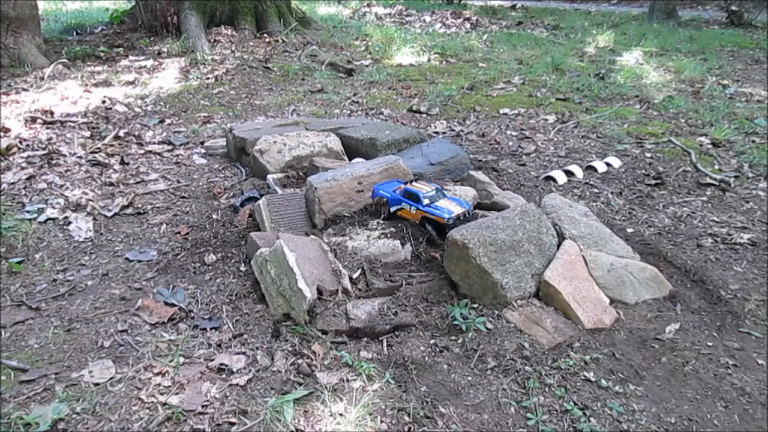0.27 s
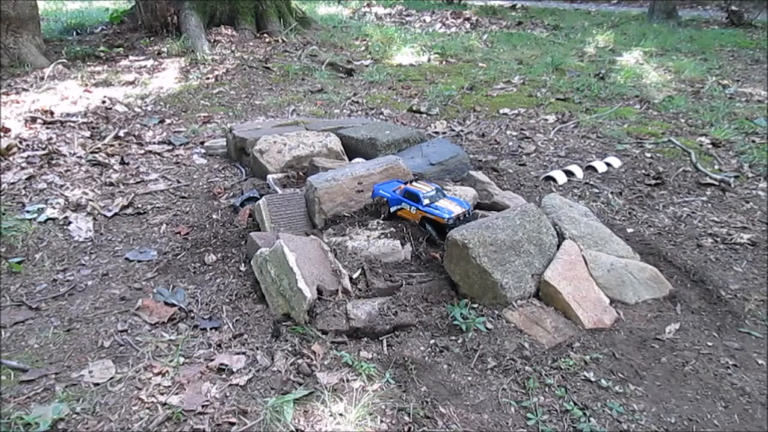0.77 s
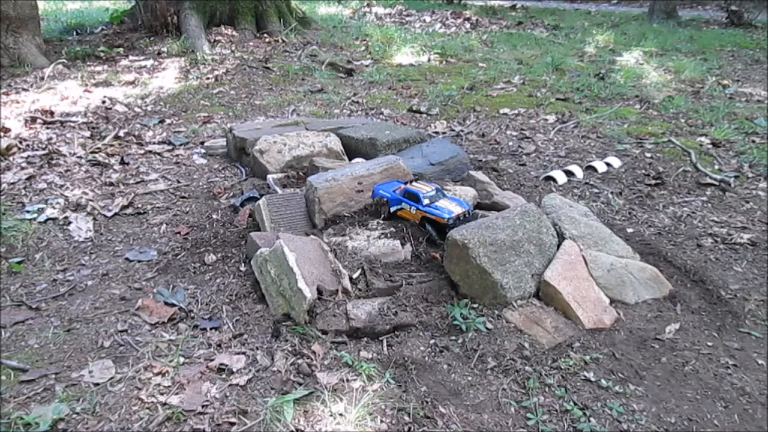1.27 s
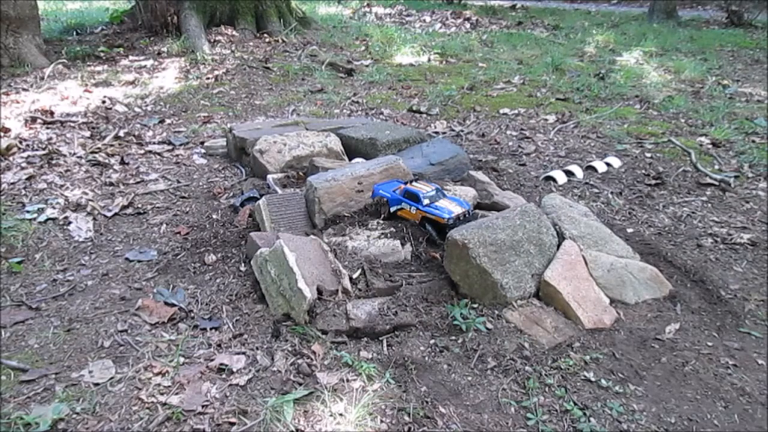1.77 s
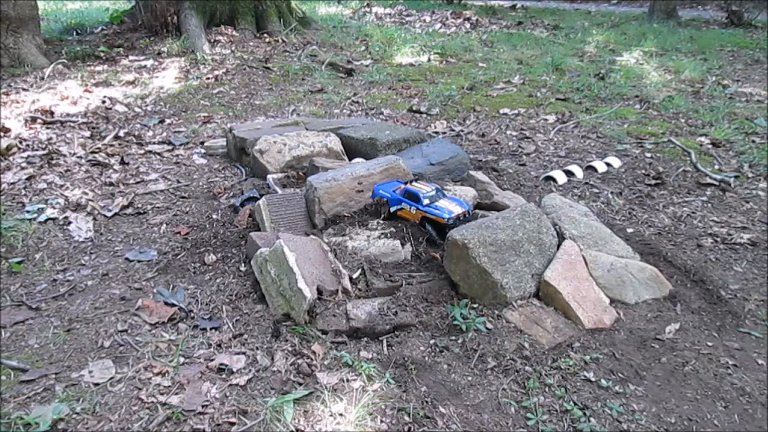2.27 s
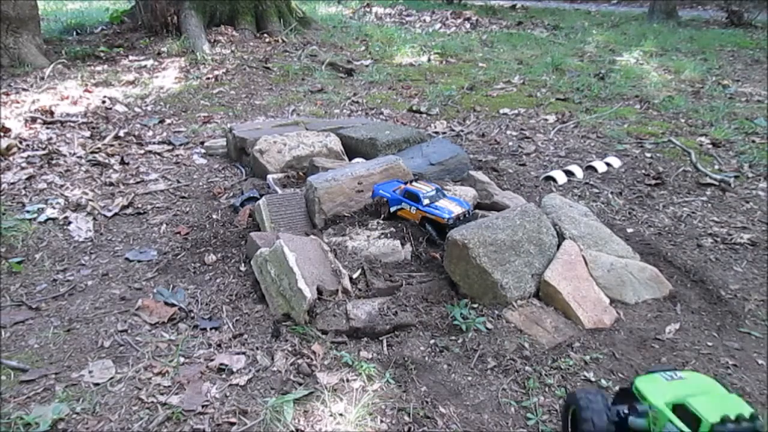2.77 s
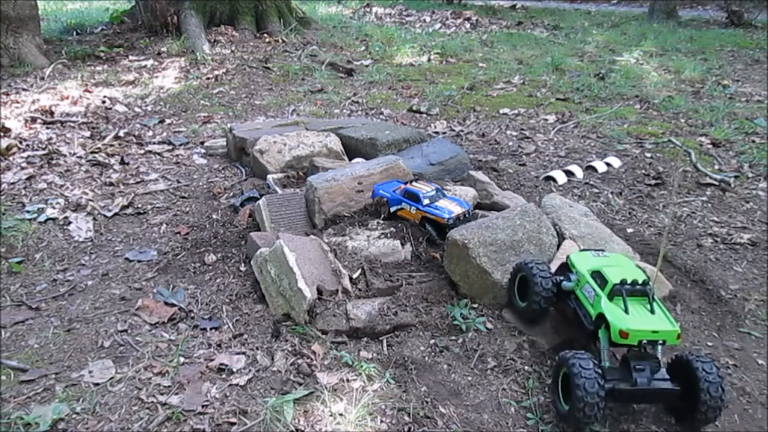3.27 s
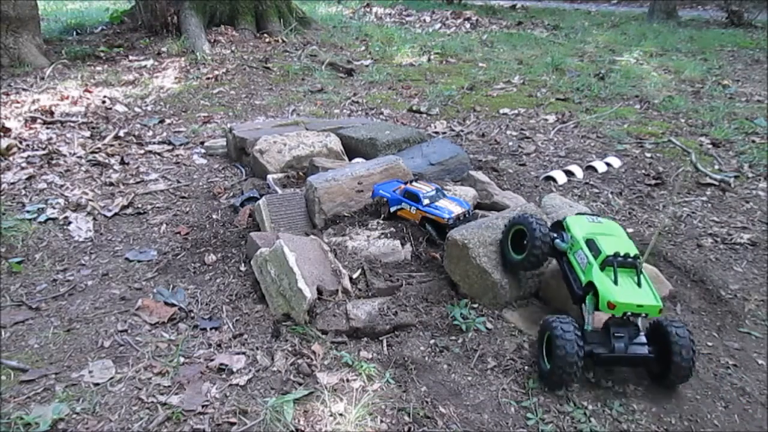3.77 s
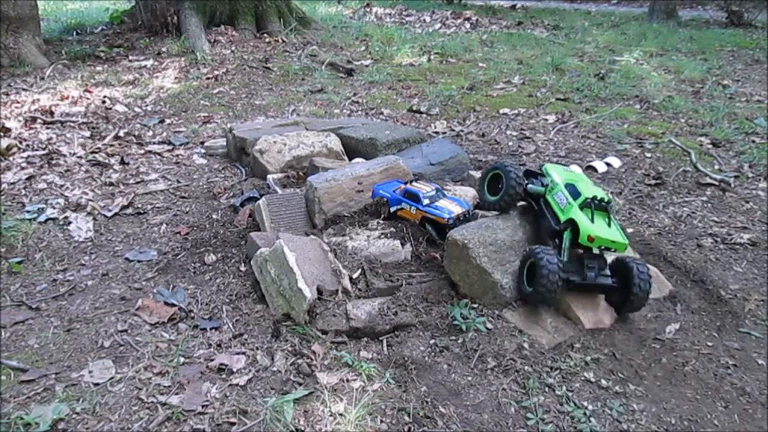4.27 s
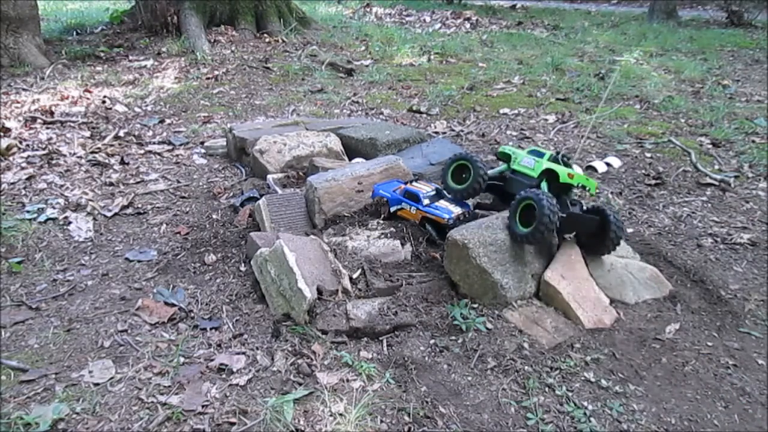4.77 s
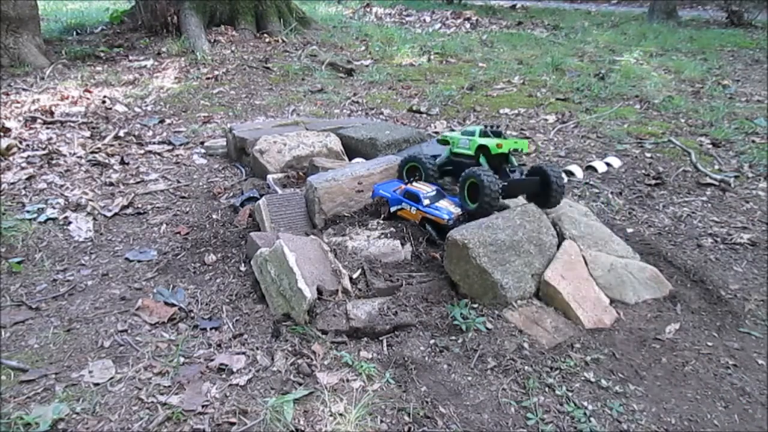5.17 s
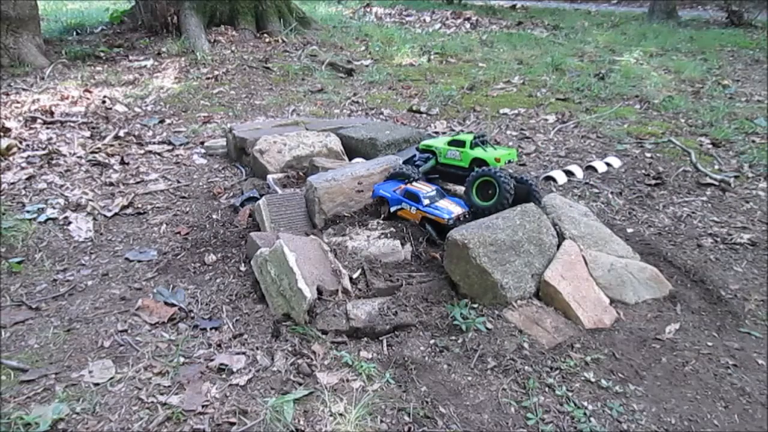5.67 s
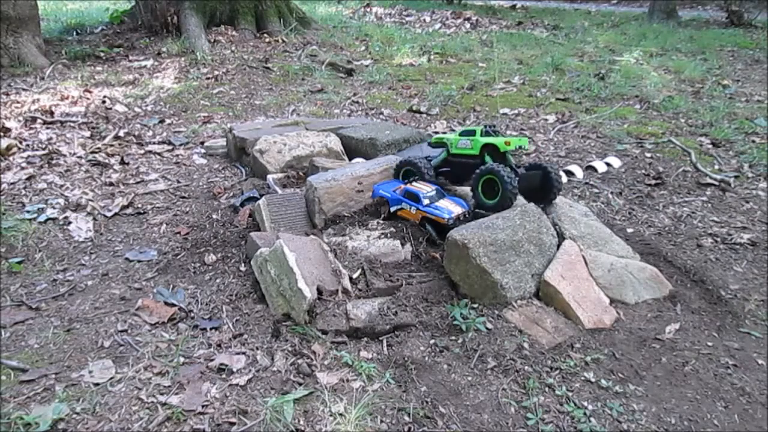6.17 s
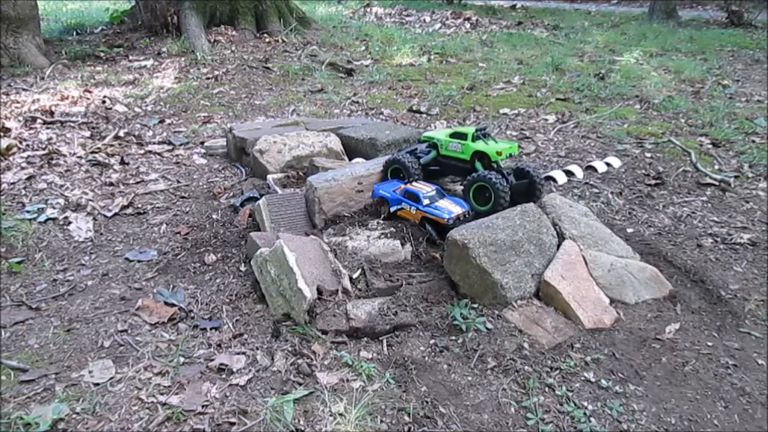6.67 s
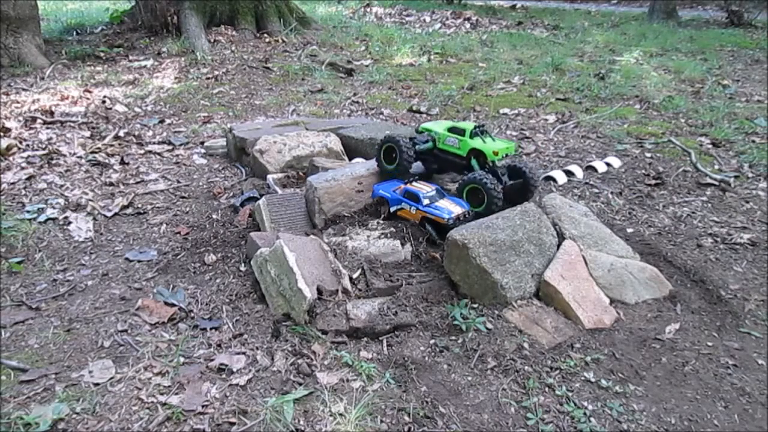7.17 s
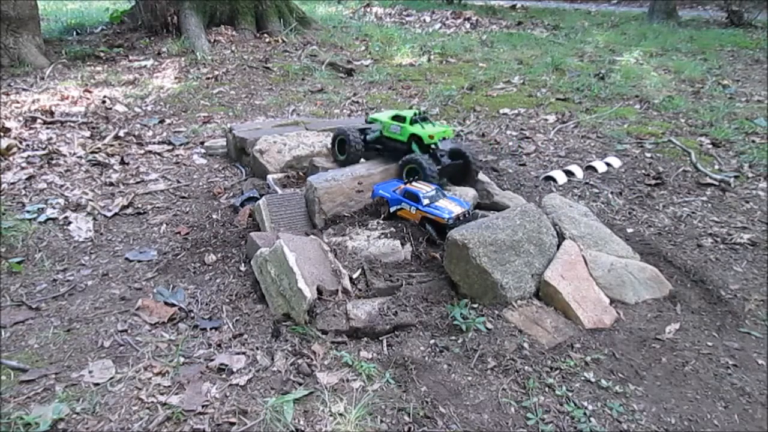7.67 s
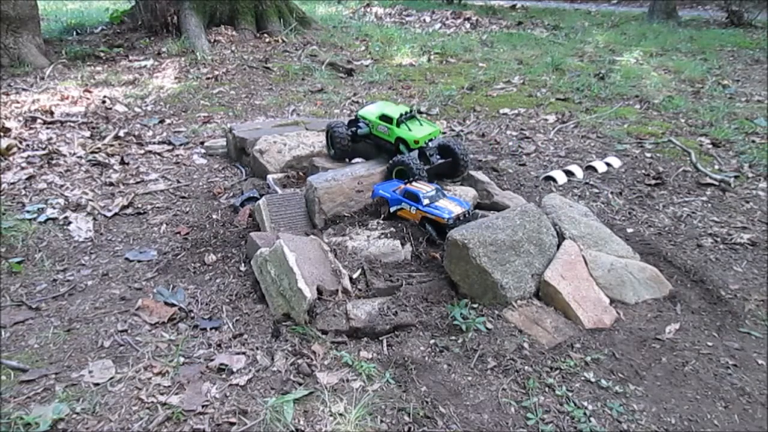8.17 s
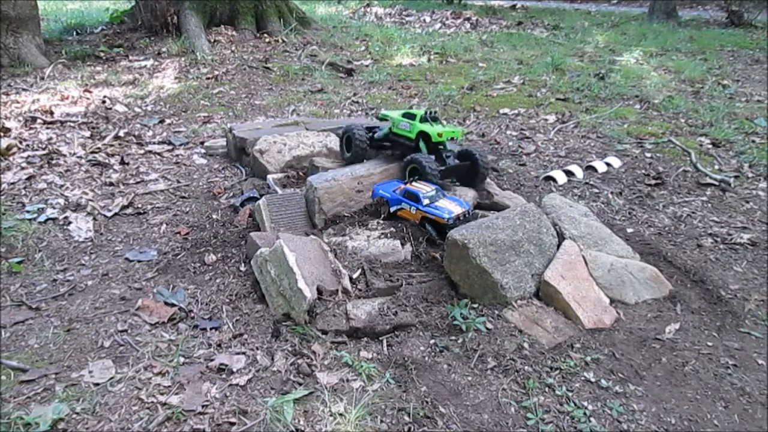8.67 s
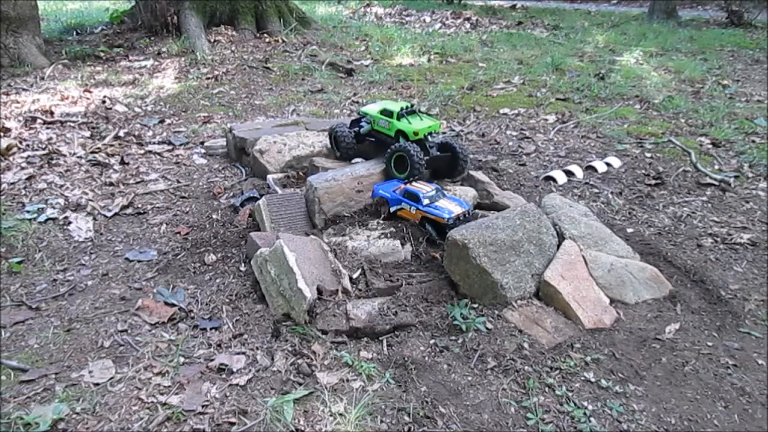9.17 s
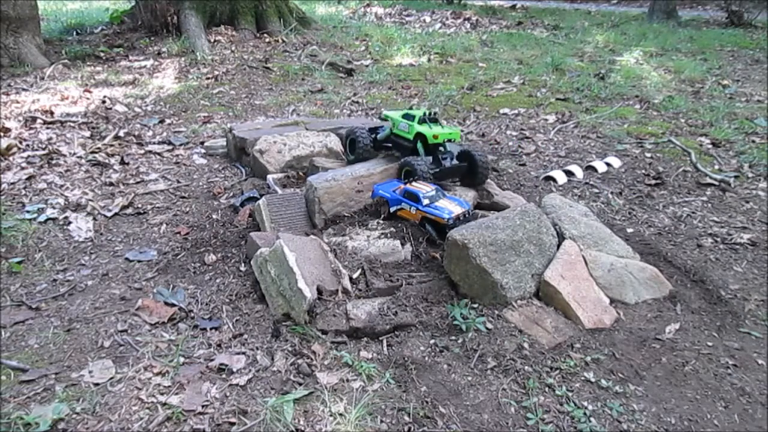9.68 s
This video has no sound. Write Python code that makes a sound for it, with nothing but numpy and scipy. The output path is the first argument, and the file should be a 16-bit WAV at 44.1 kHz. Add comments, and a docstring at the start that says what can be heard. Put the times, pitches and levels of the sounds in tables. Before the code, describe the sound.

Outdoors, over a soft hiss and a faraway hum, the plastic gearbox of a toy crawler whirs and rattles close in front of the microphone. The buggy drives past with a wavering whine, and its gears click as they slip under load. It then works its way up some rocks in stop-start bursts, with gritty scuffs, small knocks of wheels on stone and faint thin whistles in a few pauses.

```python
"""A toy remote-control crawler in a garden, over a distant low hum and a soft hiss.
It approaches in bursts of throttle, plastic gears whining and rattling in their housing, and passes
at about 2 s. It turns just after 3 s, the gears ratcheting under load. From about 4 s it climbs a rock
pile, first in longer drives, then in short bursts, with faint whistles in some pauses. Tyres scrub
grit; wheels and chassis knock on stone."""
import sys
import numpy as np
from scipy import signal
from scipy.fft import rfft, irfft, next_fast_len
from scipy.io import wavfile
from scipy.ndimage import uniform_filter1d, map_coordinates

SR = 44100
rng = np.random.default_rng(int(sys.argv[2]) if len(sys.argv) > 2 else 0)


def digitize_waveform(pressure):
    """Quantize a signal to 16-bit integers and store it at the path in sys.argv[1].

    Rows of a 2-D input are taken as channels; values are limited to [-1, 1].
    """
    field = np.atleast_2d(pressure).T
    bounded = np.clip(field, -1, 1)
    quanta = np.round(bounded * 32767).astype(np.int16)
    wavfile.write(sys.argv[1], SR, quanta)


N = 437913
PINION_TEETH = 8


def amp(db):
    """Decibels to gain."""
    return 10 ** (np.asarray(db) / 20)


def unit(x):
    """Scale to rms 1."""
    return x / np.sqrt(np.mean(x ** 2) + 1e-20)


def blend(a, b, share):
    """Constant-power mix, share of it from b."""
    share = np.clip(share, 0, 1)
    return np.sqrt(1 - share) * a + np.sqrt(share) * b


def curves(rows, outside=None):
    """One value per sample for each column after the time."""
    times_s, *columns = np.transpose(rows)
    return [np.interp(np.arange(N) / SR, times_s, column, outside, outside) for column in columns]


def wobble(knots_per_s):
    """Smooth random curve, rms near 1."""
    knots = rng.standard_normal(int(N * knots_per_s / SR) + 4)
    return map_coordinates(knots, [np.arange(N) * knots_per_s / SR])


def envelope(start_s, length_s, attack_s, release_s):
    """Smooth rise centred on the start, hold, exponential fade."""
    t = np.arange(N) / SR - start_s
    rise = np.sin(np.pi / 2 * np.clip(t / attack_s + .5, 0, 1)) ** 2
    return rise * np.exp(-np.clip(t - length_s, 0, 1) / release_s)


def filtered(x, response):
    """Multiply the spectrum by response(hz)."""
    size = next_fast_len(N + 8192)
    return irfft(rfft(x, size) * response(np.fft.rfftfreq(size, 1 / SR)), size)[..., :N]


def coloured(x, points):
    """Minimum-phase filter through (Hz, dB) points."""
    points_hz, points_db = np.transpose(points)
    hz = np.fft.rfftfreq(4096, 1 / SR)
    gain = amp(np.interp(np.log(hz + 1), np.log(points_hz), points_db))
    cepstrum = irfft(np.log(gain + 1e-6))
    half = len(cepstrum) // 2
    fold = np.r_[1, np.full(half - 1, 2), 1, np.zeros(half - 1)]
    return signal.fftconvolve(x, irfft(np.exp(rfft(cepstrum * fold))))[:N]


def band(x, lo_hz, hi_hz):
    """Causal band-pass."""
    sos = signal.butter(2, [lo_hz, min(hi_hz, SR / 2 - 1)], 'band', fs=SR, output='sos')
    return signal.sosfilt(sos, x)


def steady(x, window_s):
    """Hold the running rms near 1."""
    width = int(window_s * SR)
    power = uniform_filter1d(uniform_filter1d(x * x, width), width)
    return x / np.sqrt(np.abs(power) + 1e-3 * np.mean(x * x))


def impacts(rate_hz, jitter_cycles, scatter_db):
    """One impulse a cycle, uneven in time and size; power near 1."""
    cycles = np.cumsum(rate_hz) / SR
    late, heavy = rng.standard_normal((int(cycles[-1]), 2)).T
    at = np.interp(np.arange(len(late)) + .5 + jitter_cycles * late, cycles, np.arange(N)).astype(int)
    sizes = unit(amp(scatter_db * heavy)) * np.sqrt(SR / np.maximum(rate_hz[at], 20))
    return np.bincount(at, sizes, N)


def puff(t60_s, count=2048):
    """Decaying noise, energy 1."""
    noise = rng.standard_normal(count) * amp(-60 * np.arange(count) / SR / t60_s)
    return noise / np.linalg.norm(noise)


def ring(modes, t):
    """Damped modes struck at random strengths; peak 1."""
    strengths_db = rng.normal(0, 2.5, len(modes))
    x = sum(amp(db + extra_db - 60 * t / t60_s) * np.sin(2 * np.pi * (hz * t + rng.random()))
            for (hz, db, t60_s), extra_db in zip(modes, strengths_db))
    x = x * (1 - np.exp(-t / .00083))
    return x / np.abs(x).max()


def garden():
    """Distant swelling rumble, wavering machine hum and soft hiss."""
    # Rumble over time. Each row: time in seconds, level in dB.
    rumble_levels = [(0.0, -43), (1.9, -48), (2.85, -49), (3.4, -41.5), (6.2, -40), (6.8, -43.5),
                     (7.4, -40), (8.85, -45), (9.05, -44.5), (9.35, -39), (9.7, -48)]
    # Noise spectra. Each row: frequency in Hz, relative level in dB.
    rumble_spectrum = [(12, -61), (20, -15), (46, -11), (161, -3.5), (189, -7), (264, -8), (433, -12.5),
                       (499, -17.5), (541, -24), (567, -25), (900, -60), (1170, -68), (1980, -120)]
    hiss_spectrum = [(290, -11.5), (500, -3), (586, 0.5), (676, 0), (863, 2), (1030, -0.5), (3330, -8),
                     (9510, -31), (15500, -31)]
    # Hum partials. Each row: frequency in Hz, relative level in dB.
    hum_partials = [(58, -62), (104, -59), (162, -54), (209, -59)]
    rumble_db, = curves(rumble_levels)
    rumble = amp(rumble_db + wobble(4)) * unit(coloured(rng.standard_normal(N), rumble_spectrum))
    hum = np.zeros(N)
    for hz, db in hum_partials:
        peak = np.sqrt(2) * amp(db - 2 + 5.5 * wobble(6.1))
        hum += peak * np.sin(2 * np.pi * np.cumsum(hz + 1.35 * wobble(6)) / SR)
    hiss = amp(-43.5) * unit(coloured(rng.standard_normal(N), hiss_spectrum))
    return rumble + hum + hiss


def whistles():
    """Thin wavering tones that swell and fade in the pauses."""
    # Whistles. Each row: start and length in seconds, first and last pitch in Hz, relative level in dB.
    tones = [(5.804, 0.13, 2403, 2490, -50), (6.24, .13, 2473, 2602, -47), (7.955, 0.32, 3520, 3260, -46.5),
             (7.98, 0.3, 2660, 2620, -49), (9.1, 0.19, 3360, 3220, -50), (9.11, 0.21, 2760, 2600, -51),
             (9.236, 0.12, 2896, 2820, -48)]
    out = np.zeros(N + SR)
    for start_s, length_s, first_hz, last_hz, db in tones:
        count = int(length_s * SR)
        hz = np.linspace(first_hz, last_hz, count) * (1 + .025 * wobble(300)[:count])
        swell = amp(db + 1.5) * signal.windows.tukey(count)
        out[round(start_s * SR):][:count] += swell * np.sin(2 * np.pi * np.cumsum(hz) / SR)
    return out[:N]


def ticks():
    """Small dry clicks of grit and gear backlash."""
    # Clicks. Each row: start in seconds, relative level in dB.
    clicks = [(1.072, -10), (1.267, -14), (2.99, -15), (4.423, -9), (6.052, -15), (3.215, -14),
              (3.465, -31), (5.732, -14.5), (5.8094, -25), (5.9036, -27), (5.9393, -21.5), (6.302, -27),
              (6.9638, -18.5), (7.078, -12.5), (7.925, -23), (8.0007, -17), (8.023, -15), (8.087, -23),
              (8.315, -20), (8.7745, -10), (8.819, -13)]
    out = np.zeros(N + SR)
    for start_s, db in clicks:
        click = puff(t60_s=.019)
        out[round(start_s * SR):][:len(click)] += amp(db) * click
    return coloured(out, [(300, 5.5), (1500, 12.5), (3200, 20), (5500, 13.5), (8500, -5),
                          (12000, -15), (15500, -23)])


def crackle():
    """Treads flick grit in bright clicks; a spinning tyre scrubs it into a dense crunch."""
    # Tyre scuffs. Each row: start and length in seconds, level against the gearbox in dB.
    scuffs = [(0.669, 0.011, -11), (0.861, .11, -18), (1.049, 0.044, -12), (1.14, 0.037, -15),
              (1.289, 0.058, -9.5), (3.97, 0.033, -17), (4.021, 0.016, -12), (4.204, 0.0348, -12),
              (5.018, .02, -13), (7.769, .04, -15), (8.698, .08, -11)]
    # Grit spectrum. Each row: frequency in Hz, relative level in dB.
    grit = [(1000, -23), (4000, 1.5), (6500, 3.5), (9000, -7), (12000, -13), (15500, -26)]
    grains = impacts(rate_hz=np.full(N, 220.), jitter_cycles=1.8, scatter_db=3)
    flicks = signal.fftconvolve(grains, np.abs(puff(t60_s=.0064)))[:N] * rng.standard_normal(N)
    scrub = sum(amp(db) * envelope(start_s, length_s, attack_s=.008, release_s=.007)
                for start_s, length_s, db in scuffs)
    crunch = unit(rng.standard_normal(N) * amp(3.5 * wobble(900)))
    return coloured(amp(-22.5) * unit(flicks) + scrub * crunch, grit) / np.std(coloured(crunch, grit))


def knocks():
    """Each blow rings the chassis, thumps the hollow tyres, cracks on the stone and bounces once."""
    # Blows on stone. Each row: start in seconds, then relative dB of the whole, thud, body and crack.
    blows = [(1.03, -13.5, -25, -11, -10), (1.351, -30, -1, 0, 7), (4.269, -18, -23, -3, -3),
             (4.329, -19, -11.5, 2, -8), (5.036, -14.5, -22, -23, 1), (5.284, -14.5, -12, -25, -11),
             (5.575, -9, -36, -22, -8), (6.281, -23.5, -13, -2, -19), (6.328, -24, -35, -9, -14),
             (6.398, -13, -44, -20, 3), (6.482, -24, -5.5, -5, -5), (6.817, -6.5, -43, -10.5, -4.5),
             (6.807, -25, -32, -10, -2), (6.922, -25, -30, -2, -14), (7.228, -17, -35, -17, 2),
             (7.716, -23, -10.5, -9, 14.5), (7.805, -16, -23, -10, -2), (7.877, -20.5, -36, -8, -15),
             (8.199, -17, -25, -9, -6), (8.281, -12.5, -31, -31, 3), (8.774, -26, -11, -11, -2),
             (8.816, -34, -26, -12, 1), (9.227, -19, -26, -3, -27), (9.292, -19, -28, -11, -2),
             (9.467, -16.5, -31, -18, -3), (9.751, -15.5, -15, -25, -15), (9.882, -24, -6, -5.5, -11)]
    # Chassis and tyre modes. Each row: frequency in Hz, relative level in dB, t60 in seconds.
    chassis_modes = [(593, -11, 0.079), (744, -5.5, 0.085), (952, -0.5, 0.044), (1107, 3.5, 0.039),
                     (1385, -5, 0.046), (1690, -8.5, 0.027), (2224, -8, 0.041), (2435, -4.5, 0.031),
                     (2925, 2, 0.014)]
    tyre_modes = [(232, -9, 0.093), (317, 2, 0.02), (389, 1.5, 0.034), (507, -1.5, 0.02)]
    out, t = np.zeros(N + SR), np.arange(SR // 5) / SR
    for start_s, db, thud_db, body_db, crack_db in blows:
        modes = [(hz, mode_db + (body_db + 4.5) * (hz < 1400), t60_s)
                 for hz, mode_db, t60_s in chassis_modes]
        for delay_s, bounce_db in [(0, 2), (.005, -3)]:
            crack = band(puff(t60_s=.043, count=len(t)), 3400, 6900)
            clack = band(puff(t60_s=.028, count=len(t)), 460, 2040)
            body = amp(-6) * ring(modes, t) + amp(-8.5) * clack / np.abs(clack).max()
            thud = amp(thud_db + 5.5) * ring(tyre_modes, t)
            blow = body + thud + amp(crack_db - 9.5) * crack / np.abs(crack).max()
            out[round((start_s + delay_s) * SR):][:len(t)] += amp(db + bounce_db) * blow
    return band(out[:N], 95, 7600)


def motor():
    """Throttle drives the gears: returns gain, meshing rate, clean share and overtone share."""
    # Throttle bursts. Each row: start and length in seconds, level in dB, target meshing rate in Hz,
    # share of clean meshing, share of pure overtones.
    bursts = [(-0.1, 0.67, -24, 960.6, 0.41, 0.02), (0.603, 0.21, -28, 699.4, 0.2, 0.05),
              (0.825, 0.29, -25.5, 660.7, 0.4, 0.06), (1.169, 0.27, -36, 602.9, 0, 0.03),
              (1.382, 0.21, -28, 601.6, 0.1, 0.01), (2.986, 0.12, -27, 603, 0.3, 0.35),
              (3.217, 0.1, -29.5, 603.4, 0.47, 0.02), (4.471, 0.21, -30.5, 558.4, 0.28, 0.02),
              (5.303, 0.11, -30.5, 895.8, 0.02, 0.04), (5.967, 0.22, -30, 418, 0.2, 0.01),
              (6.384, 0.21, -29.5, 683.2, 0.54, 0.01), (6.838, 0.3, -43.5, 500.1, 0.62, 0),
              (7.149, 0.1, -34, 422, 0.34, 0.08), (7.276, 0.17, -28.5, 577.2, 0.6, 0.03),
              (7.488, 0.083, -30, 1208, 0.28, 0), (7.562, 0.15, -23.5, 1401, 0.5, 0.01),
              (7.712, .11, -25, 1418, 0.12, 0.01), (8.242, .17, -30, 458.1, 0.37, 0.18),
              (8.544, 0.13, -29, 607.3, 0.4, 0.15), (8.656, 0.12, -25.5, 982.4, 0.65, 0.1),
              (8.866, 0.1, -34.5, 399.6, 0.3, 0.1), (9.361, 0.14, -29.5, 598.7, 0.52, 0.01),
              (9.664, 0.18, -29.5, 763, 0.4, 0.04)]
    # Long drives, one list each. Each row: time in seconds, meshing rate in Hz, relative level in dB.
    drives = [
        [(1.53, 691, -27), (1.6, 745, -22.5), (1.7, 950, -22.5), (1.78, 1199, -21), (1.82, 1144, -22.5),
         (1.86, 1270, -20.5), (1.91, 1200, -23), (1.97, 1310, -20.5), (2.04, 1235, -21.5), (2.09, 1333, -20.0),
         (2.14, 1228, -23.5), (2.19, 1410, -21.5), (2.245, 1273, -25), (2.28, 1369, -20), (2.32, 1257, -23),
         (2.39, 1351, -20), (2.44, 1189, -25.5), (2.5, 1370, -21.5), (2.57, 1200, -22.5), (2.63, 1332, -21.5),
         (2.72, 1211, -25.5), (2.76, 1311, -23), (2.81, 1240, -25.5), (2.9, 1465, -22), (2.945, 1432, -21.5)],
        [(3.49, 624, -31), (3.6, 856.6, -26.5), (3.67, 980, -24.5), (3.73, 1193, -24.5), (3.76, 1127, -26.5),
         (3.8, 1229, -25.5), (3.85, 1038, -27.0), (3.92, 1018, -26.5), (3.99, 1408, -23), (4.05, 1075, -27.5),
         (4.11, 1256, -21.5), (4.16, 1177, -24.5), (4.23, 1403, -22.0), (4.3, 1250, -25.5), (4.37, 1360, -23.5),
         (4.42, 1448, -22.5)],
        [(4.68, 1168, -25.0), (4.73, 1225, -23.5), (4.77, 1285, -26.5), (4.83, 1481, -22.5),
         (4.89, 1355, -23.5), (4.94, 1501, -24.5), (5.0, 1387, -26.5), (5.07, 1241, -32), (5.12, 1438, -23.0),
         (5.19, 1345, -23.5), (5.24, 1435, -25), (5.3, 1337, -23.5)],
    ]
    # Tone of each drive. Each row: share of clean meshing, share of pure overtones.
    drive_tones = [(.7, .13), (.7, .13), (.54, .11)]
    # A tyre catches and the gears rasp. Each row: start and length in seconds, level in dB.
    surges = [(0.429, 0.022, -25), (0.513, 0.026, -26), (0.614, 0.025, -21), (0.711, 0.029, -23),
              (0.778, 0.023, -24.5), (0.829, 0.098, -25), (1.074, 0.031, -27.5), (1.14, 0.027, -21),
              (1.272, 0.043, -26), (3.153, 0.035, -30), (3.462, 0.034, -37.5), (4.396, 0.039, -33),
              (5.267, 0.026, -28), (5.448, 0.017, -30), (5.505, 0.014, -33), (5.6, .02, -37),
              (5.649, 0.051, -33.5), (5.718, 0.037, -35), (5.768, 0.016, -37.5), (5.956, 0.038, -25),
              (6.398, 0.021, -21.5), (6.475, 0.012, -22.5), (6.601, 0.029, -45), (6.842, 0.041, -36),
              (7.087, 0.019, -28), (7.222, 0.011, -23), (7.32, 0.018, -26), (8.279, 0.02, -24.5),
              (8.366, 0.036, -27.5), (8.499, 0.02, -36), (8.825, 0.013, -30), (8.88, 0.019, -36),
              (9.384, 0.031, -24.5), (9.451, 0.022, -24), (9.624, 0.026, -25), (9.709, 0.044, -24),
              (9.856, 0.017, -28)]
    idle_db, crawl_hz = -52.5, 438
    spin_up_s, coast_s, edge_s = .055, .039, .022
    t = np.arange(N) / SR
    power = np.full(N, amp(idle_db) ** 2)
    push_hz, clean, overtone = np.zeros((3, N))
    for start_s, length_s, db, target_hz, *shares in bursts:
        power += (amp(db) * envelope(start_s, length_s, attack_s=.05, release_s=coast_s)) ** 2
        on = (t >= start_s) & (t < start_s + length_s + coast_s)
        push_hz[on] = target_hz - crawl_hz
        clean[on], overtone[on] = shares
    # the motor lags the throttle and sinks back to a crawl
    inertia = np.exp(-1 / (spin_up_s * SR))
    mesh_hz = crawl_hz + signal.lfilter([1 - inertia], [1, -inertia], push_hz, zi=push_hz[:1])[0]
    for drive, shares in zip(drives, drive_tones):
        start_s, end_s = drive[0][0], drive[-1][0]
        drive_hz, db = curves(drive)
        power += (amp(db - .5) * envelope(start_s, end_s - start_s, edge_s, edge_s)) ** 2
        on = (t >= start_s) & (t < end_s + edge_s)
        mesh_hz[on] = drive_hz[on]
        clean[on], overtone[on] = shares
    for start_s, length_s, db in surges:
        power += (amp(db) * envelope(start_s, length_s, attack_s=.029, release_s=.0091)) ** 2
    # uneven ground: the whine breaks up, the speed lurches
    whine = clean * amp(6 * wobble(22))
    mesh_hz *= 1 + .008 * wobble(20)
    return np.sqrt(power), mesh_hz, whine / (whine + 1 - clean), overtone


def meshing(mesh_hz):
    """Tooth impacts of one axle; each pinion tooth has a drifting flaw, which adds sidebands."""
    sag_share, sag_hz = .036, 16  # speed sags and recovers at every tread block
    tread_phase = 2 * np.pi * (sag_hz * np.arange(N) / SR + .25 * wobble(5) + rng.random())
    sag = sag_share * signal.sawtooth(tread_phase, .25)
    rate_hz = mesh_hz * (1 + sag + .014 * wobble(45) + .007 * wobble(130))
    cycles = np.cumsum(rate_hz) / SR
    turns = int(cycles[-1] / PINION_TEETH)
    flaws = signal.lfilter(*signal.butter(2, .13), rng.standard_normal((2, turns, PINION_TEETH)), axis=1)
    late, heavy = unit(flaws).reshape(2, -1)
    at = np.round(np.interp(np.arange(len(late)) + .5 + .09 * late, cycles, np.arange(N))).astype(int)
    sizes = np.sqrt(SR / rate_hz[at])
    teeth = np.bincount(at, (1 + .45 * heavy) * sizes, N)
    chipped_tooth = np.bincount(at[::PINION_TEETH], sizes[::PINION_TEETH], N)
    return unit(teeth) + .15 * unit(band(chipped_tooth, 2600, 3400))


def overtones(mesh_hz):
    """Partials at multiples of half the meshing rate flare singly; the housing lifts those near 3 kHz."""
    rate_hz = mesh_hz * (1 + .022 * wobble(40) + .005 * wobble(300))
    half_phase = np.pi * np.cumsum(rate_hz) / SR
    tones = sum(amp(6.5 * wobble(30)) * np.sin(k * half_phase + 2 * np.pi * rng.random())
                for k in range(3, 12))
    response = [(600, -8), (2200, -5), (2950, -1), (3600, -3), (5000, -2), (6500, -3), (9000, -14)]
    return steady(coloured(tones, response), window_s=.08)


def slipping():
    """Teeth jump under load and ring the gear wheel: returns the clicks and their share of the sound."""
    # Slips. Each row: start and length in seconds, first and last click rate in Hz,
    # share of the gearbox sound, share of ring in a click.
    slips = [(-0.005, .1, 100, 130, .55, .15), (.095, .14, 132, 152, .45, .2),
             (.235, .135, 152, 175, .2, .5), (1.421, .085, 92, 88, .5, .03),
             (2.984, .15, 128, 100, .6, .08), (3.21, .075, 70, 115, .6, 0), (3.285, .07, 115, 95, .6, 0),
             (3.515, .17, 48, 60, .1, .75), (3.8, .14, 56, 58, .08, .75), (4.56, .09, 50, 54, .12, .6),
             (6.02, .06, 72, 100, .6, .1), (6.08, .135, 98, 84, .65, .15), (8.345, .07, 138, 130, .4, .1),
             (9.485, .045, 110, 120, .45, .1)]
    spells = [curves([(start_s, first_hz, *shares), (start_s + length_s, last_hz, *shares)], outside=0)
              for start_s, length_s, first_hz, last_hz, *shares in slips]
    rate_hz, share, ring_share = np.max(spells, axis=0)
    blows = impacts(rate_hz, jitter_cycles=.025, scatter_db=1.7)
    t = np.arange(512) / SR
    click_shape = np.exp(-t / .0015) * (1 - np.exp(-t / .0003))
    chatter = signal.fftconvolve(blows, click_shape)[:N] * np.sign(rng.standard_normal(N))
    clicks = blend(unit(band(chatter, 380, SR / 2)), unit(band(blows, 2680, 3160)), ring_share)
    return clicks / np.std(clicks[share > 0]), share


def singing():
    """A wheel unloads and its gears sing in a rough glide: returns the tone and its share of the sound."""
    # Glides. Each row: start and length in seconds, first, middle and last pitch in Hz,
    # share of the gearbox sound.
    glides = [(1.53, .1, 2600, 2850, 2980, .18), (1.54, .07, 680, 700, 730, .07),
              (1.55, .085, 1350, 1460, 1780, .14), (1.555, .06, 2080, 2140, 2130, .13),
              (1.555, .05, 3480, 3570, 3620, .08), (1.625, .145, 2980, 2830, 3520, .33),
              (1.615, .06, 3750, 3620, 3520, .14), (1.71, .06, 5780, 5980, 6080, .04),
              (1.775, .05, 6050, 5780, 5650, .07), (1.89, .04, 6150, 5900, 5650, .05),
              (1.94, .04, 6150, 6000, 5750, .04), (2.17, .08, 1480, 1380, 1250, .1),
              (2.25, .095, 1500, 1350, 1190, .24), (2.33, .08, 1260, 1370, 1400, .2),
              (2.49, .07, 1480, 1330, 1190, .24), (2.62, .1, 1430, 1370, 1250, .16),
              (3.51, .11, 1450, 1700, 2100, .1), (3.59, .1, 1750, 1930, 2020, .12),
              (3.66, .08, 1580, 1780, 1720, .06), (3.66, .1, 1000, 1170, 1230, .2),
              (3.71, .05, 5750, 5950, 6080, .07), (3.8, .1, 1650, 1500, 1620, .09),
              (4.08, .11, 4450, 4780, 5000, .08), (3.76, .1, 1180, 1210, 1130, .25),
              (3.78, .09, 2480, 2330, 2000, .1), (3.85, .07, 1010, 1060, 1020, .17),
              (3.95, .095, 1330, 1530, 1170, .22), (4.08, .06, 1170, 1210, 1190, .17),
              (4.13, .08, 1330, 1480, 1620, .07), (4.23, .09, 1620, 1760, 1860, .1),
              (4.28, .05, 2480, 2550, 2600, .08), (4.36, .085, 2620, 2850, 3060, .16),
              (4.625, .05, 1600, 1580, 1590, .35), (4.685, .05, 1180, 1185, 1200, .25),
              (4.695, .05, 3000, 3280, 3450, .14), (4.8, .1, 2750, 2920, 3200, .16),
              (4.92, .11, 1510, 1420, 1540, .15), (5.095, .12, 1450, 1380, 1370, .2),
              (5.125, .08, 3300, 3200, 3370, .15), (6.395, .05, 3480, 3300, 3050, .15),
              (7.275, .08, 3100, 3200, 3520, .25), (7.365, .095, 1420, 1330, 1380, .3),
              (7.585, .07, 1250, 1280, 1650, .1), (7.62, .11, 2680, 2930, 3080, .32),
              (7.625, .045, 6000, 6250, 6500, .06), (7.808, .04, 1850, 1620, 1400, .2),
              (8.59, .085, 4800, 4720, 4740, .2), (8.68, .085, 2750, 2980, 3300, .18),
              (9.625, .035, 3350, 3550, 3500, .2), (9.685, .07, 1500, 1580, 1560, .14)]
    tone, share = np.zeros((2, N))
    for start_s, length_s, *pitches_hz, peak_share in glides:
        first, count = round(start_s * SR), int(length_s * SR)
        hz = np.polyval(np.polyfit([0, .5, 1], pitches_hz, 2), np.linspace(0, 1, count))
        phase = 2 * np.pi * np.cumsum(hz) / SR
        runout = 1 + .5 * np.sin(phase / PINION_TEETH + 2 * np.pi * rng.random())
        roughness_rad = .55 * unit(band(rng.standard_normal(count), 30, 300))
        swell = peak_share * signal.windows.tukey(count, .6)
        tone[first:][:count] += np.sqrt(2 * swell) * runout * np.sin(phase + roughness_rad)
        share[first:][:count] += swell
    return tone, np.clip(share, 0, 1)


def reflections(x, depth_db):
    """As the car rocks among the stones, reflections lift and cancel shifting bands."""
    spectrum = signal.stft(x, nperseg=512)[2]
    bins, frames = spectrum.shape
    grid = np.meshgrid(np.arange(bins) / 2.622, np.arange(frames) / 11, indexing='ij')
    ripple = map_coordinates(rng.standard_normal((bins, frames)), grid, mode='mirror')
    return signal.istft(spectrum * amp(depth_db * ripple), nperseg=512)[1][:N]


def housing(force):
    """Tooth forces ring the plastic housing; each place turns another face of it to the listener."""
    # Plastic resonances. Each row: centre in Hz, width in Hz, gain in dB.
    resonances = [(1620, 150, -7), (3690, 600, -2), (4730, 470, -7), (5880, 230, -4), (6600, 1600, -15),
                  (10960, 1100, -2)]
    # Housing response at each place. Each row: frequency in Hz, relative level in dB.
    passing = [(180, -57), (300, -23.5), (708, -11), (1050, -12), (1350, -5), (1870, -11.5), (2440, 0),
               (2980, -6.5), (3230, -11), (3810, -6), (4140, -8), (5850, -15.5), (6570, -17.5),
               (11500, -35.5), (15500, -64)]
    approaching = [(180, -27), (300, -15), (411, -15), (720, -7), (953, -7.5), (1670, -5), (2140, -5.5),
                   (2720, 1.5), (3690, -10), (4720, -7.5), (5660, -17.5), (6570, -15.5), (7370, -22),
                   (10400, -35), (15500, -50)]
    turning = [(180, -68), (300, -27), (360, -12), (397, -43), (446, -14), (581, -19.5), (877, -9),
               (1750, -1.5), (2610, -2), (2930, -2), (3280, -4), (5850, -8.5), (7370, -19.5),
               (11100, -35.5), (15500, -48)]
    climbing = [(180, -40), (300, -17), (674, -5), (1090, -5), (1180, 1.5), (1260, -5), (1540, -2),
                (2140, -2.5), (2930, 0.5), (4210, -3.5), (5950, -7.5), (7250, -12.5), (8840, -28),
                (11300, -26), (15500, -49)]
    on_top = [(180, -51), (300, -5), (446, -4), (652, -13), (708, -1.5), (1090, 1), (1350, 7), (2210, -1.5),
              (3020, 1), (4140, -6), (4650, -4.5), (7250, -15), (8990, -30.5), (11000, -29.5), (15500, -46)]
    # Route. Each row: time in seconds, place as an index into faces.
    route = [(1.45, 1), (1.8, 0), (2.9, 0), (3, 1), (3.17, 1), (3.22, 2), (3.62, 2), (3.8, 3), (5.4, 3),
             (6.3, 4), (7.5, 4), (7.6, 3), (7.9, 3), (8.5, 4)]
    faces = [passing, approaching, turning, climbing, on_top]
    place, = curves(route)
    ringing = filtered(force, lambda hz: 1 + sum(
        amp(db) * 1j * hz * width_hz / (centre_hz ** 2 - hz ** 2 + 1j * hz * width_hz)
        for centre_hz, width_hz, db in resonances))
    return sum(np.maximum(1 - np.abs(place - k), 0) * unit(coloured(ringing, face))
               for k, face in enumerate(faces))


def heading(sound):
    """The car's heading sets the balance of low whine, 2-4 kHz rasp and high fizz."""
    # Band balance. Each row: time in seconds, relative whine level in dB, fizz against rasp in dB.
    balance = [(0.0, -7, -7.5), (1.25, -9.5, -9), (1.6, -6, -0.5), (1.85, -8.5, -6), (2.1, -7.5, -11),
               (2.36, -2.5, -11.5), (2.45, -7, -9.5), (2.52, -2.5, -9.5), (2.58, -4.5, -9),
               (2.68, -0.5, -7), (3.09, -8.5, -6), (3.26, 5, 1.5), (3.51, 2.5, -1), (3.74, -3.5, -3),
               (3.93, -8, -2.5), (4.0, -4.5, -5.5), (4.22, -8.5, -3.5), (4.4, -7, -9.5), (4.55, -6, -3.5),
               (5.7, -4.5, -1), (6.05, -7.5, -12), (6.42, -7.5, -3), (6.95, -3, 0), (7.6, -8.5, -5),
               (8.68, -6, -1), (9.4, -8, -5), (9.93, -7.5, 1)]
    whine_db, fizz_db = curves(balance)
    low = filtered(sound, lambda hz: 1 / (1 + (hz / 2107) ** 8))
    body = filtered(sound, lambda hz: 1 / (1 + (hz / 4160) ** 8))
    whine, rasp, fizz = (steady(part, window_s=.11) for part in (low, body - low, sound - body))
    whine *= unit(amp(2.6 * wobble(32)))  # breaks up under load
    mix = amp(whine_db + 4) * whine + rasp + amp(fizz_db) * fizz
    return amp(-2.5) * mix / np.sqrt(1 + amp(fizz_db) ** 2)


def drivetrain():
    """Two axles, loose teeth and slips sound through the housing; glides and grit share their gain."""
    gain, mesh_hz, clean_share, overtone_share = motor()
    load = .4 + .5 * np.tanh(1.5 * wobble(18))  # shifts between the axles as the car rocks
    teeth = unit(blend(meshing(mesh_hz), meshing(mesh_hz * 1.07), load))
    rattle = unit(rng.standard_normal(N) * amp(.65 * wobble(700) + 2.9 * wobble(170)))
    force = reflections(blend(rattle, teeth, clean_share), depth_db=2.7)
    force = blend(unit(force), .48 * overtones(mesh_hz), overtone_share)
    force = blend(force, *slipping())
    gears = housing(force)
    glide, glide_share = singing()
    flutter = amp(wobble(35))
    return gain * flutter * (np.sqrt(1 - glide_share) * heading(gears) + glide + crackle())


def scene():
    """The car straight ahead; ground and stones scatter a little of its treble to the sides."""
    car = drivetrain() + knocks() + ticks()
    scatter = signal.fftconvolve(car, np.pad(puff(t60_s=.023), (130, 0)))[:N]
    side = coloured(scatter, [(500, -62), (1400, -96), (2800, -31.5), (5600, -17.5), (11000, -15.5)])
    mid = car + garden() + whistles()
    return np.array([mid + side, mid - side])


def record(dry):
    """Round off the highest peaks, dull the top octave, cut at the band limit."""
    ceiling, rolloff_hz, limit_hz = .38, 14500, 15750
    rounded = dry / (1 + np.abs(dry / ceiling) ** 6) ** (1 / 6)
    return filtered(rounded, lambda hz: (hz < limit_hz) / np.sqrt(1 + (hz / rolloff_hz) ** 12))


dry = scene()
out = record(dry)
digitize_waveform(out)
```